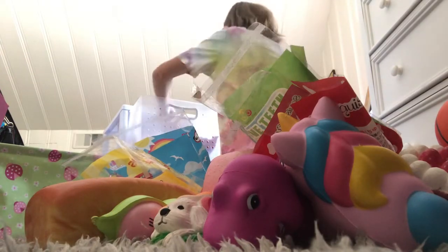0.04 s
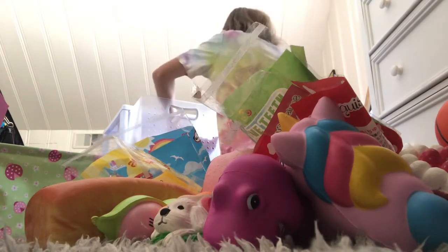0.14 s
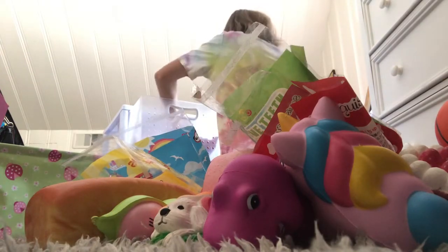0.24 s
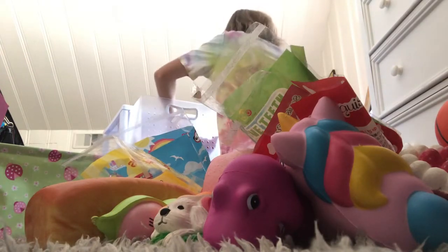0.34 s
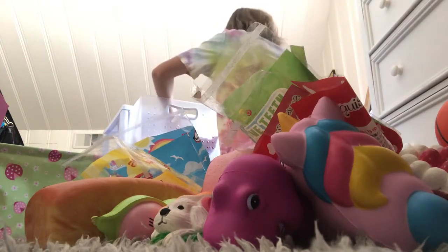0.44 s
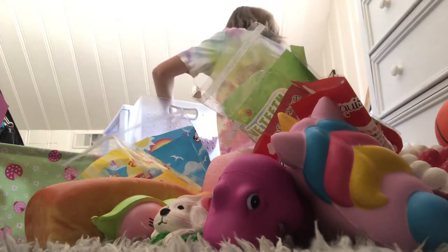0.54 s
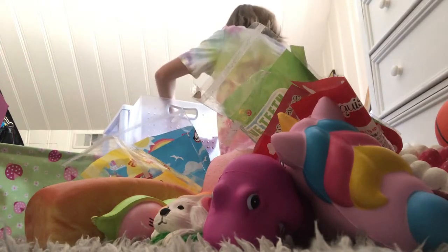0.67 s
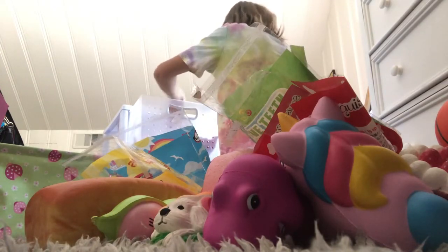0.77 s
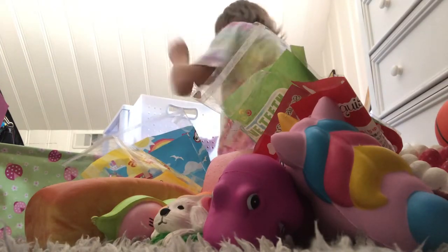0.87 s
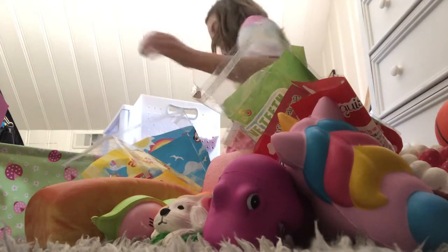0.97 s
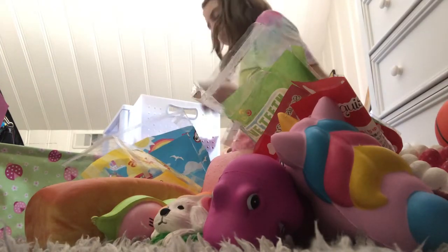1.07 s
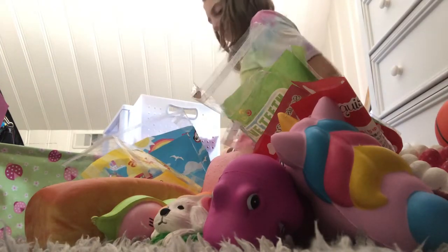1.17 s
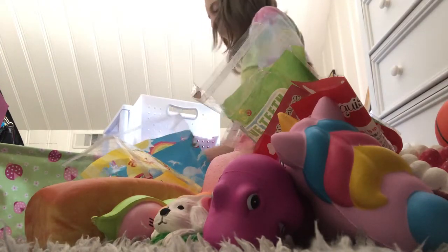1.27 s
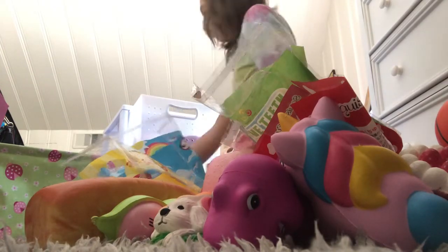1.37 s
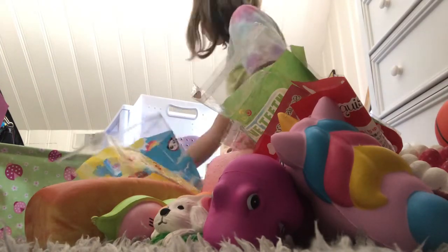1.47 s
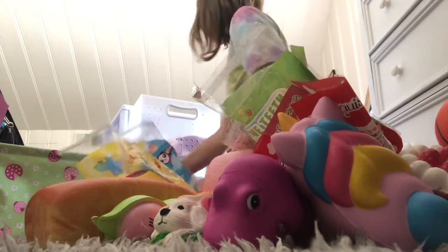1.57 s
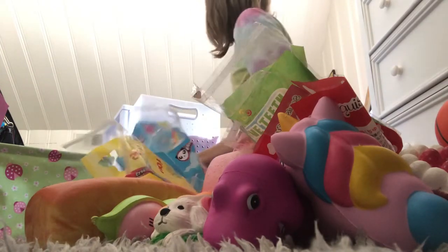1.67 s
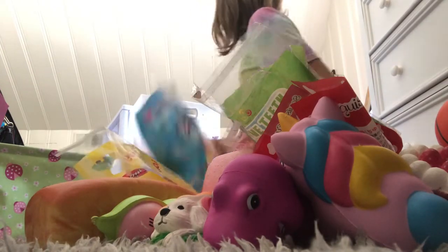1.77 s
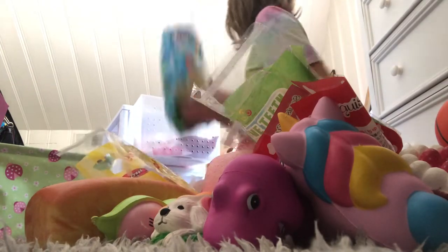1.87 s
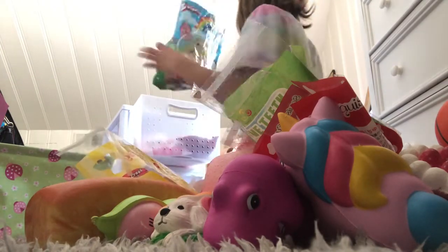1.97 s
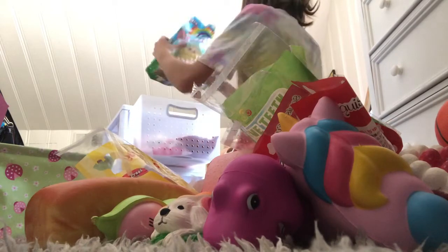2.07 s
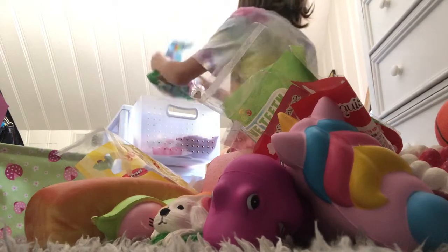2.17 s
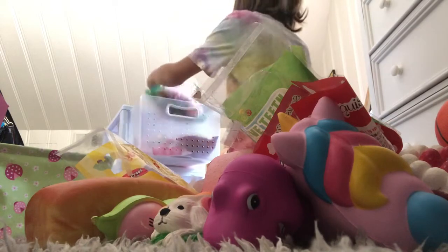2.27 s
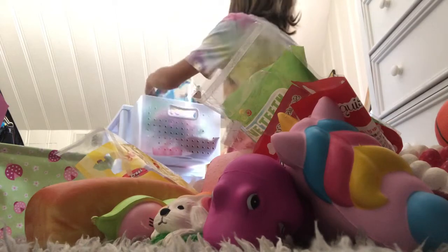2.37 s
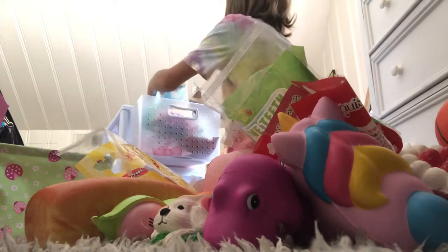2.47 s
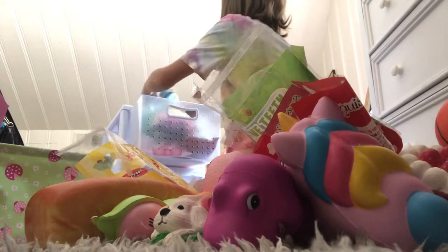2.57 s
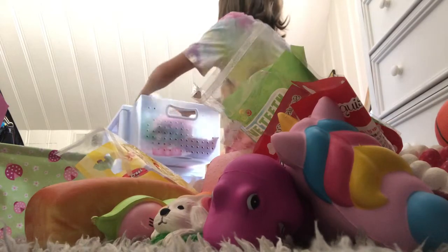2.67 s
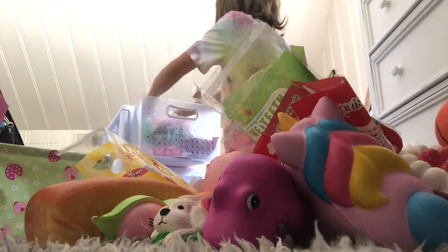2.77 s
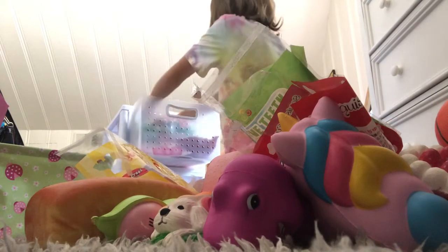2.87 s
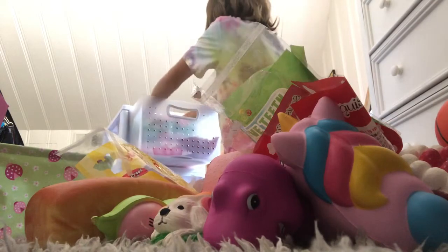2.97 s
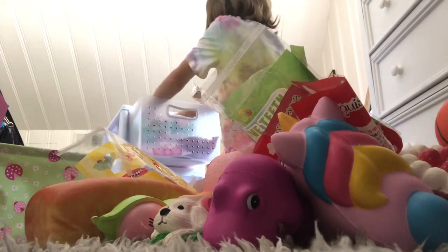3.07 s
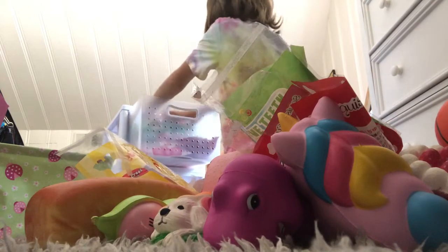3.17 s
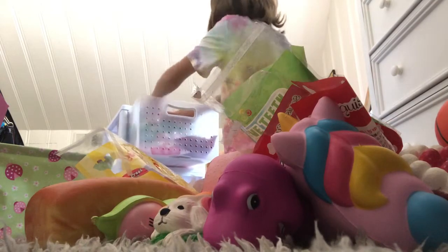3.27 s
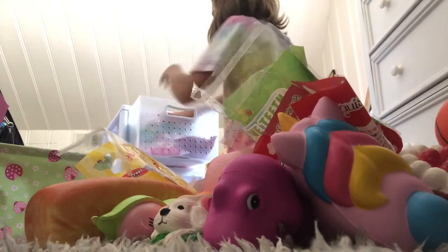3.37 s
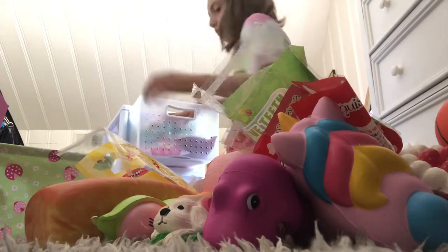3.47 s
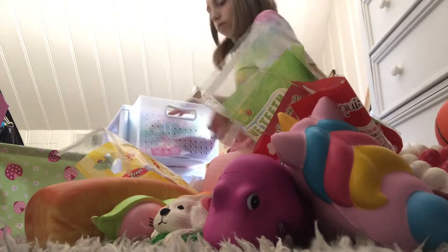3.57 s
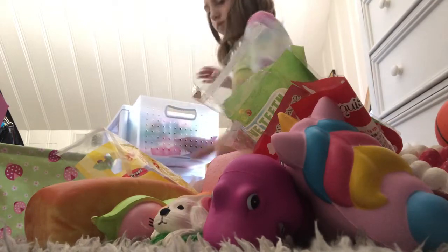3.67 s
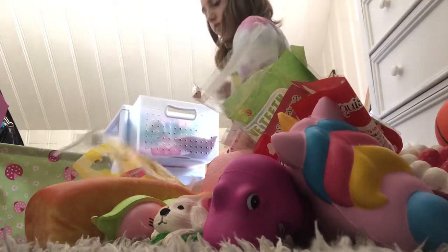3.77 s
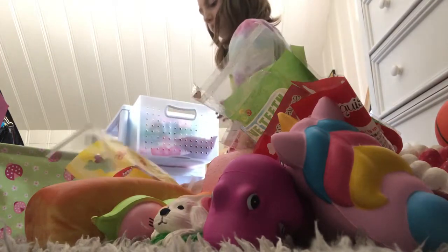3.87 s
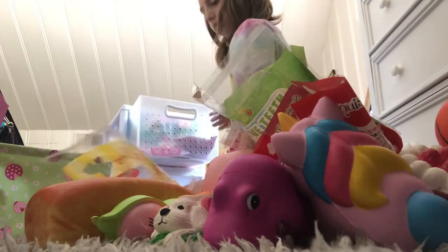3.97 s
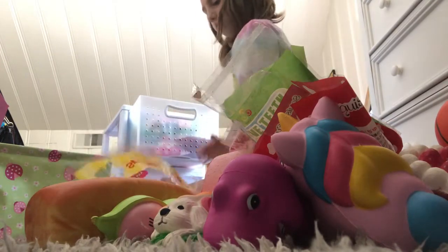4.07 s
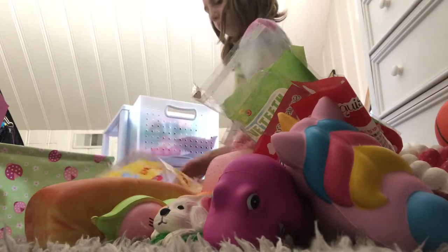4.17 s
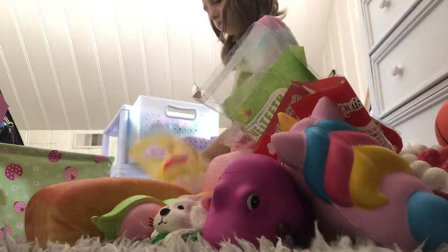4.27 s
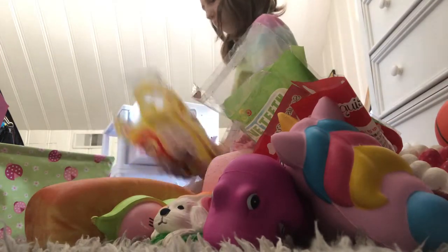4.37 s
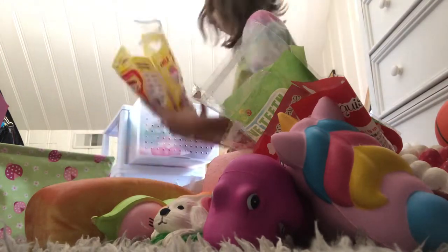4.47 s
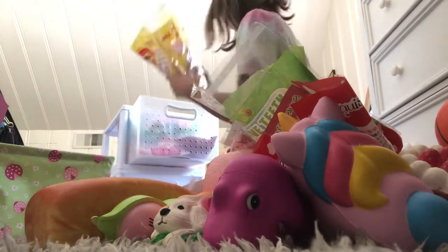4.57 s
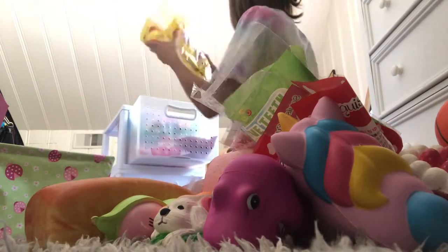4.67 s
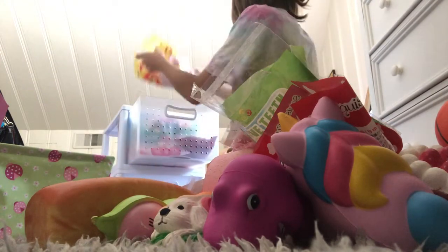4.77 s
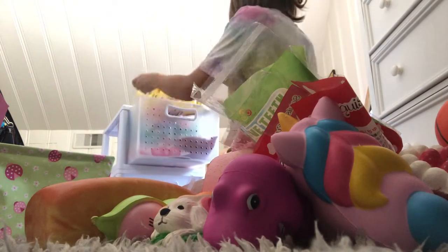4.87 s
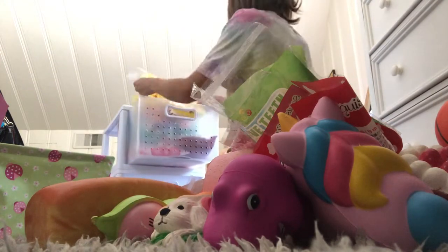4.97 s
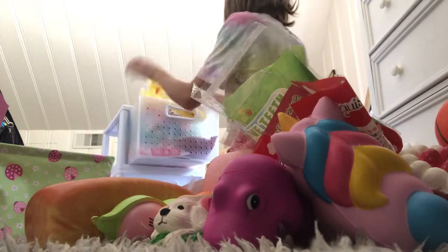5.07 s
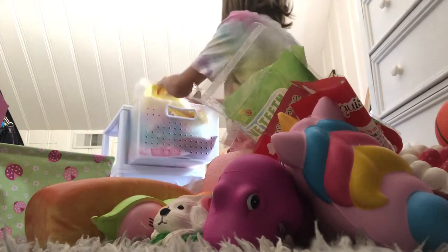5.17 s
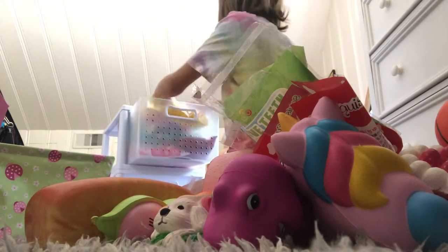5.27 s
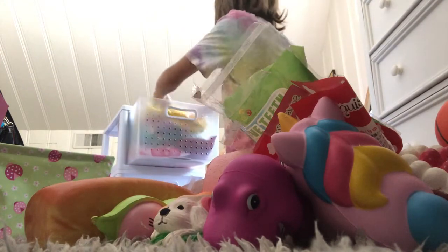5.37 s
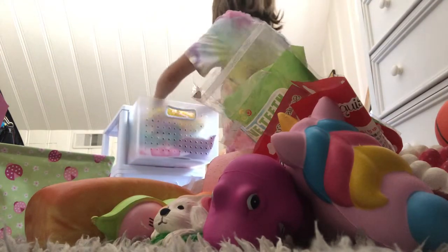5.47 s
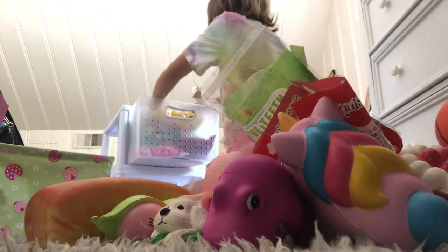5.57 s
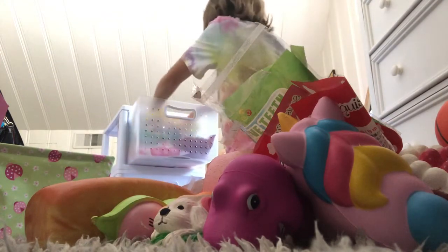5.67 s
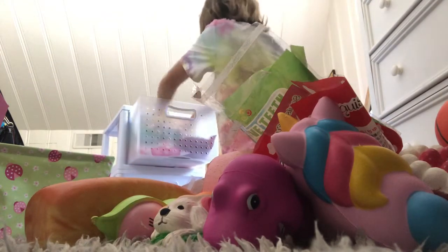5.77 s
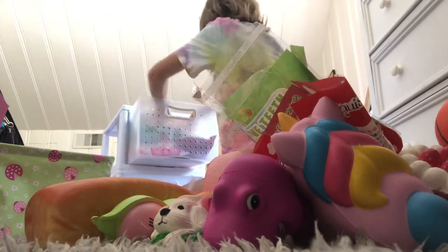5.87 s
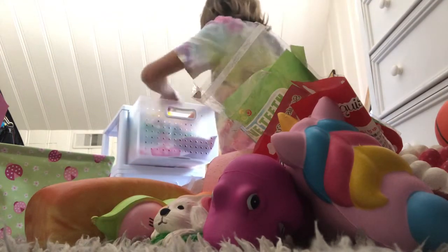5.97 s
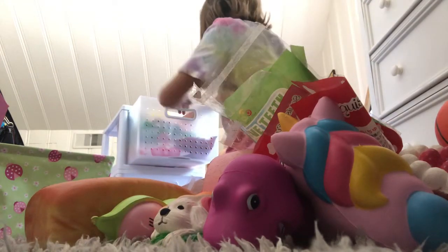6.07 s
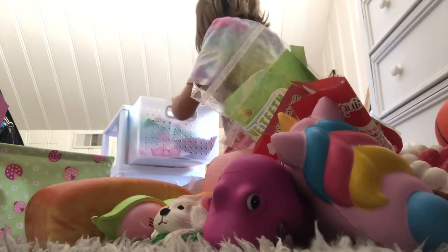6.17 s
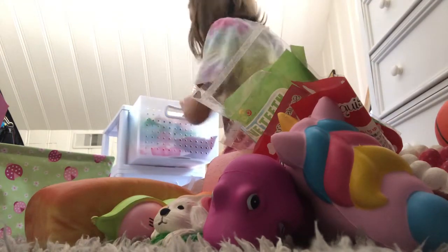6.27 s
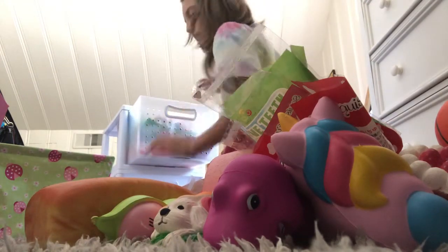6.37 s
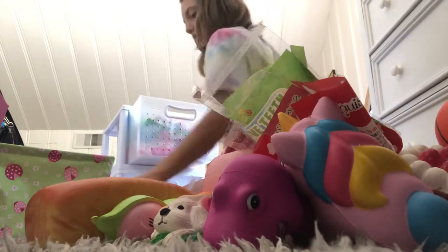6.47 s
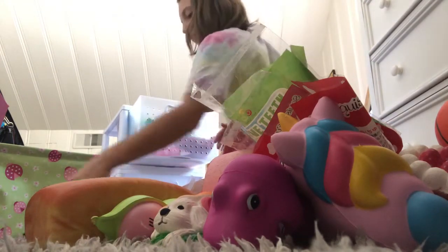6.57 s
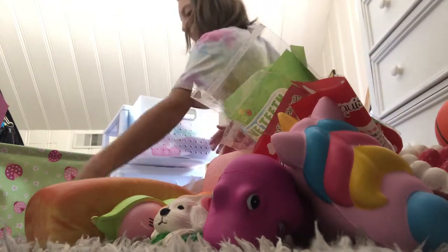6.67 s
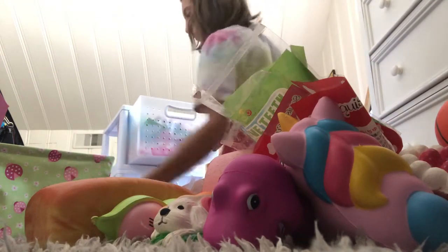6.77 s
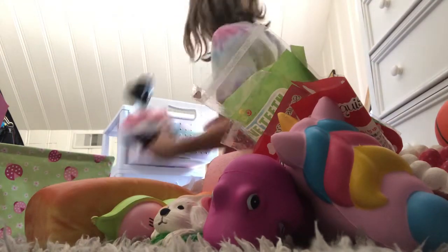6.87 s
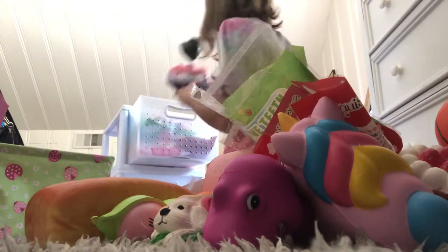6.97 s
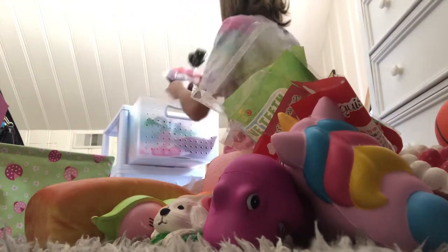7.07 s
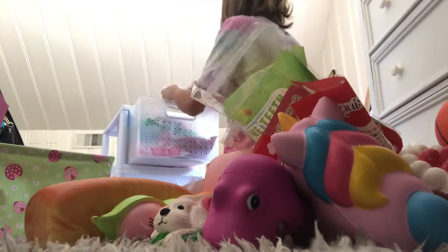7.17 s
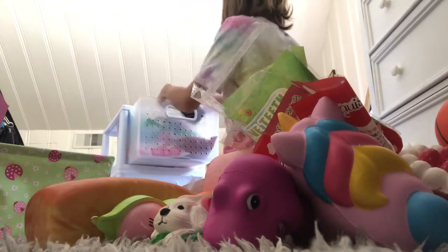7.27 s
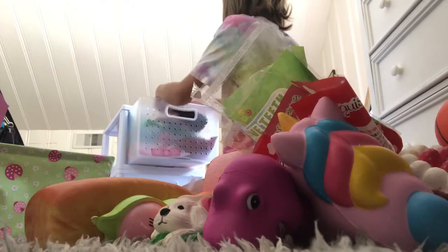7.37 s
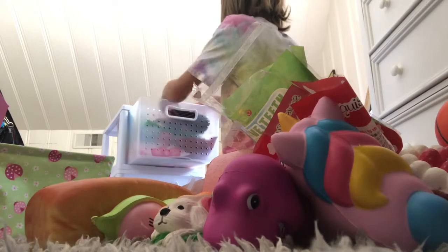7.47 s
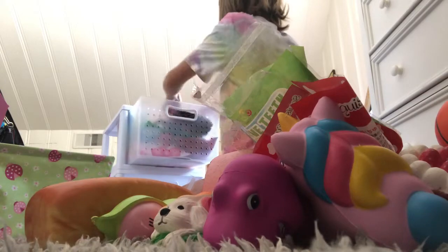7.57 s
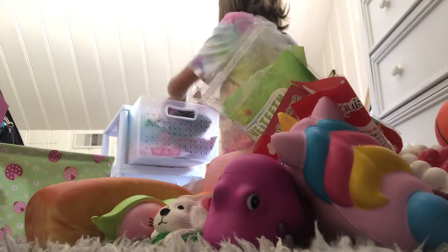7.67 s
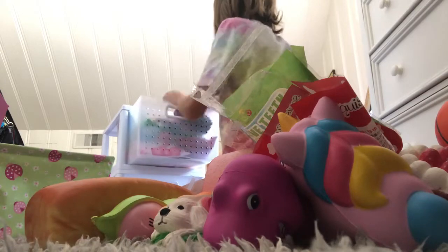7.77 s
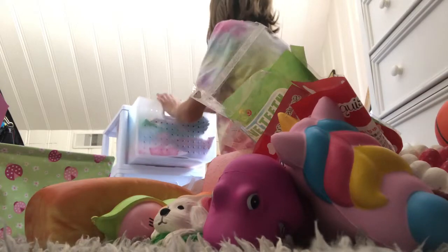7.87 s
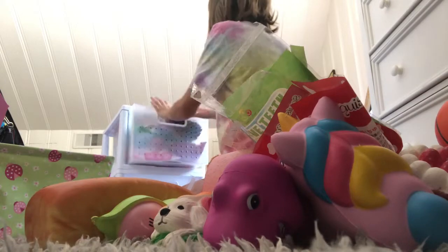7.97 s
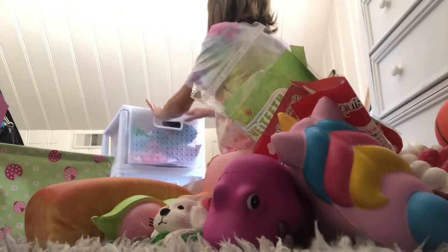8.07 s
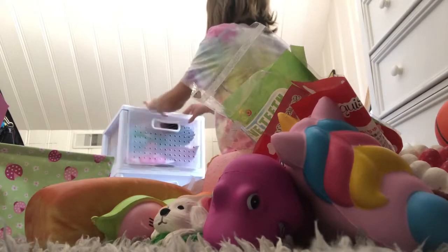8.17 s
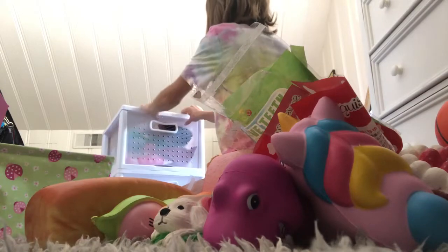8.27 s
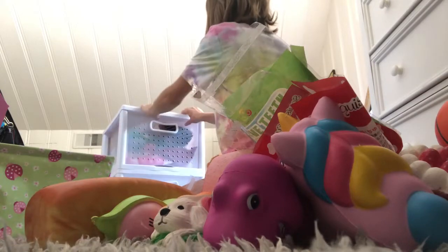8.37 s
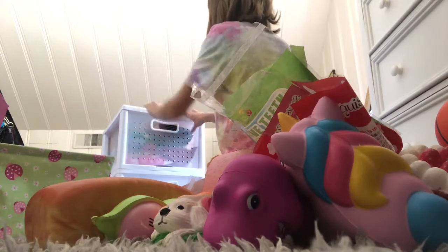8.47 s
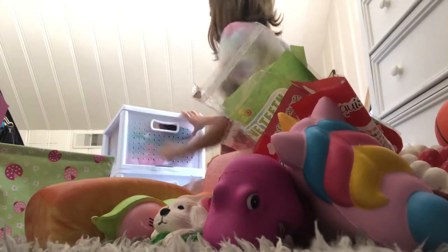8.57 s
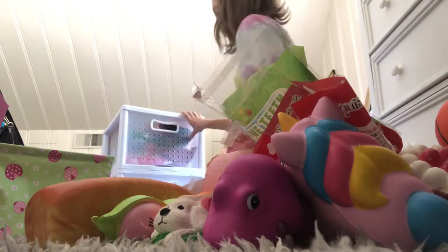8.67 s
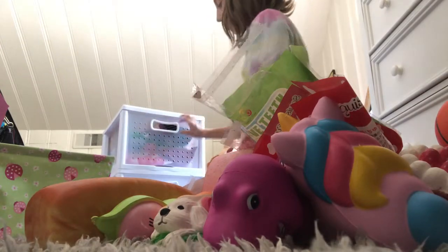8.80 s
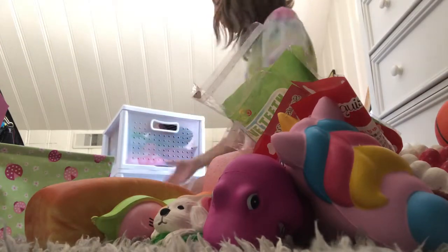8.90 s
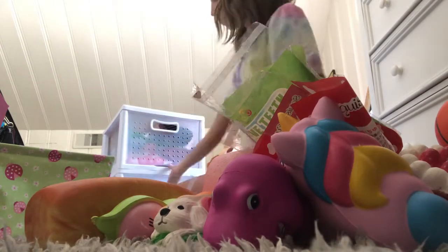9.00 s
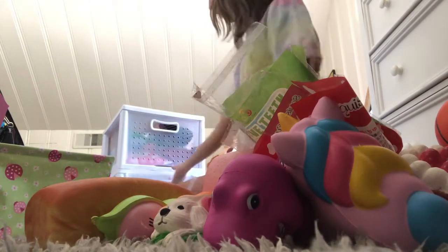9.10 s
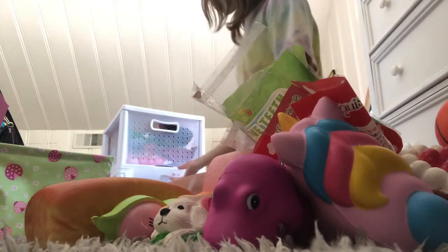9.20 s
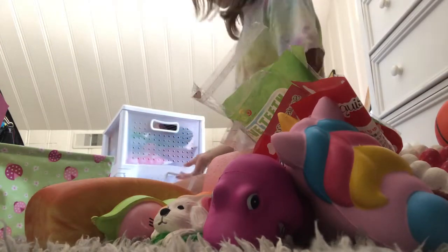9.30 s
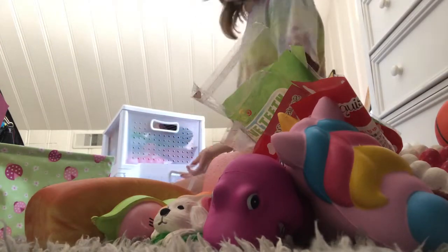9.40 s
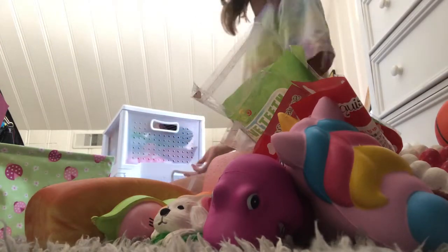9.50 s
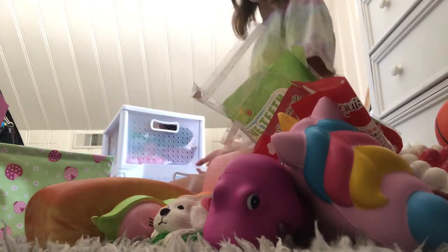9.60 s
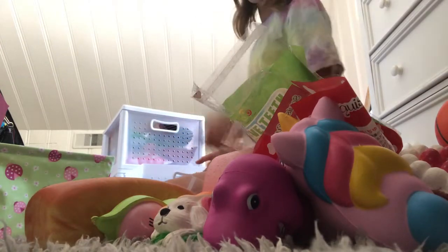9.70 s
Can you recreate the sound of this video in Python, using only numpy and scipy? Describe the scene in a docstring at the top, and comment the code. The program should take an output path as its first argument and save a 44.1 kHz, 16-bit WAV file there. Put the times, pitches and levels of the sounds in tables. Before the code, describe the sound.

Faint rustling gives way to loud crinkling as a packet is lifted and stuffed into a hollow plastic drawer, then a second, then a smaller one with a tiny squeak of film. Snaps are crisp, pops woody and short. A double knock closes the drawer; after near quiet, low scraping and several light knocks slide another out. Close microphone, dry small room, soft air noise.

```python
"""Plastic film crackles and snaps, panels pop and a hollow drawer rumbles in a small bedroom.
Toy packets are lifted, squeezed and stuffed into the drawer; it is then shut with a knock and the next slid out.
Film, panels and rubbing are random slips ringing banks of resonances, shaped by the strokes of the hands.
Snaps, pops and squeaks are single events; knocks ring the drawer's modes.
Cloth swishes once, over soft ventilation noise and a low hum."""
import sys
import numpy as np
from scipy import signal
from scipy.fft import rfft, irfft
from scipy.io import wavfile
from scipy.ndimage import uniform_filter1d

SR = 44100
rng = np.random.default_rng(int(sys.argv[2]) if len(sys.argv) > 2 else 0)


def store_pcm(level_fs):
    """Save levels as 16-bit WAV."""
    pcm = np.round(np.clip(level_fs, -1, 1) * 32767).astype(np.int16)
    wavfile.write(sys.argv[1], SR, np.atleast_2d(pcm).T)


N = 429534
TIME = np.arange(N) / SR
BRIEF = TIME[:13230]  # 0.3 s, for single events and echoes

# Ventilation spectrum. Each row: frequency in Hz, relative level in dB per Hz.
AIR_COLOUR = [(15, -87), (25, -78), (66, -18.5), (123, -11), (175, -6.5), (285, -10), (363, -13.5),
              (476, -3.5), (677, -5), (734, -3), (796, -7), (1190, -15.5), (3720, -31), (14800, -34.5),
              (16000, -48)]
# Drawer meeting its frame. Each row: start in seconds, relative level in dB,
# contact brightness (low-pass corner) in Hz, pitch of the modes as a ratio.
KNOCKS = [(4.941, -23, 1506, 1), (7.881, -22, 1400, 0.97), (8.103, -24, 1200, 0.93),
          (8.2942, -13.5, 1400, 0.92), (8.3044, -13.5, 1100, 1), (9.013, -24.5, 1500, 0.93),
          (9.169, -15.5, 1100, 0.95), (9.179, -16.5, 500, 0.59), (9.266, -22, 800, 0.86),
          (9.299, -25, 594, .68), (9.357, -21.5, 1090, 1), (9.405, -29, 700, 0.72), (9.475, -28, 400, 0.51),
          (9.52, -18.5, 910, 0.89), (9.543, -24, 1100, 0.83), (9.549, -18, 500, 0.84),
          (9.565, -24, 119.6, 0.99), (9.596, -27, 1000, 0.98)]
# Drawer resonances. Each row: frequency in Hz, relative level in dB, t60 in seconds.
DRAWER_MODES = [(76.5, -23, 0.44), (110, -26.5, 0.2), (136, -27, 0.4), (210, -11, 0.077), (272, -18, 0.14),
                (320, -15, 0.043), (423, -4.5, 0.047), (493, -0.5, 0.057), (582, 3.5, 0.061),
                (766, 10.5, 0.015), (956, -9, 0.077), (1110, 2, 0.046), (1196, -13, 0.11),
                (1390, 1.5, 0.03), (1540, -13, 0.073), (2080, -6, 0.0064), (2470, -8, 0.021),
                (2840, -6, 0.017), (3380, -7.5, 0.01), (5420, -11, 0.023), (7240, -20, 0.023)]
# Spectrum of hollow rubbing. Each row: frequency in Hz, relative level in dB per Hz.
HOLLOW_COLOUR = [(50, -47.5), (80, -21), (140, -11), (200, -5), (320, -1.5), (400, 2), (470, 7), (540, 5.5),
                 (620, 4.5), (800, 4.5), (1200, -3.5), (3000, -19)]
# Taut film squeaking under the fingers. Each row: start in seconds, length in seconds,
# slip rate at start in Hz, slip rate at end in Hz, overtone level in dB.
SQUEAKS = [(6.803, .024, 2600, 2680, -45), (6.822, .018, 2350, 2720, -38), (6.839, .02, 2150, 2600, -42)]
# Spectrum of flexing panels. Each row: frequency in Hz, relative level in dB per Hz.
PANEL_COLOUR = [(150, -32), (350, -22.5), (600, -6), (930, 1.5), (1350, 0), (1700, -6.5), (2200, -4),
                (3000, -22.5), (4200, -14), (9000, -14.5)]
# Stiff panels and toys popping against each other. Each row: start in seconds,
# relative level in dB, pitch in Hz, decay time constant of the push in ms.
POPS = [(0.539, -24, 479, 4.1), (0.804, -19.5, 720, 2), (1.294, -14.5, 513, 2.9), (1.3235, -7.5, 1100, 5.1),
        (1.597, -4, 1423, 11.4), (1.62, -6, 955, 4.3), (1.633, -10, 460, 3.1), (1.67, -9, 1110, 3.2),
        (1.683, -2, 930, 6.1), (1.717, -9, 960, 5.6), (1.752, -5.5, 1100, 7), (1.89, -1.5, 883, 3.5),
        (2.074, -0.5, 750, 2.2), (2.196, -11.5, 783, 3.5), (2.437, -14, 1440, 3.5), (2.578, -16, 2190, 7),
        (3.02, -15, 1001, 3.9), (3.247, -19, 743, 3.5), (3.279, -12.5, 991, 4.3), (3.798, -14, 921, 7.6),
        (3.83, -12, 821, 5.3), (3.844, -6.5, 890, 3.1), (4.013, -20, 930, 1.8), (4.089, -9, 684, 2.1),
        (4.277, -19.5, 960, 1.43), (4.389, -10.5, 890, 5), (4.675, -16.5, 770, 3.2),
        (4.94, -6.5, 1380, 3.7), (5.013, -19, 724, 4.9), (5.437, -7.5, 750, 6.7), (6.457, -20.5, 993, 5.8),
        (6.579, -20, 1960, 6.3), (6.712, -17, 921, 4.1), (6.786, -5, 1080, 6.5), (7.157, -16, 1010, 2.5),
        (7.331, -13.5, 940, 7.7), (7.37, -15, 1270, 4.2), (7.447, -16, 886, 4.1), (7.612, -13, 744, 4),
        (7.742, -18, 935, 2.8), (7.825, -10.5, 1270, 1.1), (7.88, -11, 840, 1.9), (7.964, -12, 1200, 5.4),
        (8.102, -11.5, 963, 3.4), (9.17, -12, 1140, 4.6)]
# Sharp creases snapping over. Each row: start in seconds, relative level in dB,
# pitch in Hz, relative share of the panel in dB.
SNAPS = [(0.0223, -31, 12300, -27), (0.186, -29, 7600, -13), (0.4638, -36, 7670, -4),
         (0.582, -35, 5520, -13), (0.626, -24.5, 13300, -13), (0.6868, -26, 13400, -23),
         (0.8036, -26.5, 7100, -8), (1.3104, -28, 4510, -6), (1.3503, -21, 8170, 1),
         (1.3608, -18, 10100, -3), (1.38, -17, 10200, -21), (1.4975, -15.5, 9790, -2),
         (1.6175, -12, 5330, -16), (1.748, -16, 11500, -20), (1.8146, -12.5, 9850, -5),
         (1.833, -11.5, 11400, -20), (1.8891, -13.5, 4910, -27), (1.9485, -16.5, 5700, -14),
         (1.9614, -17, 7390, -15), (1.9894, -4, 12400, -4.5), (1.994, -11, 6340, -25),
         (2.0662, -8.5, 14900, -0.5), (2.0724, -13, 5860, -12), (2.0877, -8.5, 9700, -4.5),
         (2.139, -5.5, 9410, -6.5), (2.2224, -15.5, 8000, -7), (2.2347, -20.5, 8160, 3),
         (2.311, -16, 5230, -19), (2.437, -20, 10700, -11), (2.5643, -12.5, 8360, -5),
         (2.5792, -18, 8020, -20), (2.597, -16, 9280, -22), (2.726, -25, 6000, 3),
         (2.8193, -10, 11500, -27), (2.9193, -26, 5000, 12.5), (3.2975, -18, 8140, -7),
         (3.344, -16.5, 8740, -12), (3.4282, -19.5, 8900, -8), (3.576, -26, 7640, -1),
         (3.706, -35, 8540, -18), (4.064, -18.5, 11600, -24), (4.347, -33, 4950, 3),
         (4.3694, -23, 14000, -15), (4.4005, -30.5, 4200, 6), (4.506, -24, 8220, -16),
         (4.5466, -14, 10600, -16), (4.577, -15, 13800, -15), (4.6064, -8, 10100, -10.5),
         (4.6564, -18.5, 6830, -2), (4.799, -20, 11800, -4), (4.8369, -9.5, 13200, -6.5),
         (5.183, -16.5, 7850, -12), (5.447, -14.5, 9300, -17), (5.6386, -16, 9310, -0.5),
         (6.3939, -31, 8630, -6), (6.505, -15, 10400, -13), (6.537, -13, 12000, -30),
         (6.553, -20, 10900, -27), (6.6782, -32.5, 7190, 8), (6.7306, -23, 13700, 0),
         (6.761, -21, 11900, -4), (6.7922, -15, 13900, -13), (6.948, -18, 14400, -25),
         (7.0275, -26, 8850, -25), (7.0334, -22, 8270, -16), (7.2466, -18, 13300, -6.5),
         (7.2727, -22, 10200, -18), (7.412, -20, 7810, -3), (7.8236, -20, 10000, -18),
         (8.4048, -35.5, 8700, -7), (8.4866, -40, 5130, -4), (9.009, -38, 9000, -4)]
# Spectrum of creasing film. Each row: frequency in Hz, relative level in dB per Hz.
CREASE_COLOUR = [(400, -15.5), (1200, -7), (2200, -4), (3000, -3.5), (3900, -7), (5200, -2), (7000, 2.5),
                 (9000, 4), (12000, 2), (15500, 0)]
# Where the packet is. Each row: time in seconds, share inside the drawer from 0 to 1,
# tautness of the film as top treble gain in dB.
PLACE = [(0, 0.5, 5.5), (.8, 0.55, -1.5), (1.3, 0.5, 2.5), (2.1, 0.9, -2.5), (2.45, 0.97, -1.5),
         (3.5, 1, -5), (3.8, 0.57, 2.5), (4.7, 0.6, -3.5), (5.2, 1, 1.5), (6.35, 1, -2), (6.5, 0.2, -1),
         (6.82, 0.1, 10.5), (7.0, 0, 5.5), (7.4, 0.7, 2.5), (8.2, 1, -6), (8.8, 1, 20), (9.6, 1, -19)]
# Each grip, pull or push of the hands. Each row: start in seconds, length in seconds,
# crease crackle in dB, panel flexing in dB, hollow rubbing in dB, swell from start to end in dB.
STROKES = [ (0.01, 0.068, -37, -48, -47, 6), (0.098, .07, -47, -47.5, -56, 4),
           (0.16, 0.27, -38.5, -44, -49.5, -8), (0.458, 0.13, -48, -52, -51, -3),
           (0.613, 0.21, -49, -54, -54.5, -14), (1.293, 0.055, -49, -37, -43, 6),
           (1.346, 0.074, -38, -35.5, -47, -4), (1.452, .11, -33, -32, -37.5, 2.5),
           (1.567, 0.069, -26.5, -26.5, -33, 2.5), (1.658, 0.2, -31, -30, -37, -7.5),
           (1.901, 0.11, -31.5, -35, -42, 8), (2.036, 0.052, -25, -29.5, -35.5, -2),
           (2.095, .24, -31, -39.5, -39, -2.5), (2.356, 0.086, -32, -32.5, -40, 12),
           (2.452, 0.36, -32, -40, -40, 0.5), (2.774, 0.083, -28, -31, -36.5, 3.5),
           (2.854, .17, -33.5, -36.5, -42, 3.5), (3.029, .17, -38.5, -41, -45, 6),
           (3.234, 0.16, -34.5, -38, -42, -2.5), (3.425, 0.092, -37, -42, -39.5, -8),
           (3.506, 0.093, -46, -45.5, -46, -5), (3.62, 0.12, -55, -56, -52, -6),
           (3.794, 0.033, -38, -37, -39, -2), (3.823, 0.078, -35, -33, -40, -5.5),
           (3.922, 0.096, -39, -33, -43, 6), (4.041, .15, -36, -34, -41, -3),
           (4.237, 0.065, -43.5, -41.5, -50, 12.5), (4.338, 0.14, -45.5, -45, -46.5, -5),
           (4.515, 0.19, -35, -40, -45.5, -5), (4.69, 0.18, -39, -49, -47, 8),
           (4.878, .28, -34.5, -40.5, -43, -3.5), (5.17, 0.063, -32, -37.5, -39.5, -1),
           (5.216, 0.25, -28.5, -34.5, -36.5, 0), (5.464, .13, -37.5, -40.5, -44, 2),
           (5.603, 0.072, -32.5, -36, -44, -1), (5.683, .25, -30.5, -36.5, -40, -2.5),
           (5.94, 0.13, -33.5, -40, -46, -1), (6.096, 0.13, -32.5, -37, -40, -3),
           (6.263, 0.066, -36.5, -38.5, -48, -2), (6.342, 0.066, -44, -54, -62, 4),
           (6.492, .06, -30, -38, -48, -5), (6.582, .09, -54, -49, -59, -14),
           (6.694, 0.15, -36.5, -36.5, -46.5, 9.5), (6.884, 0.088, -46, -44, -49.5, -3),
           (7.008, 0.1, -43.5, -49.5, -50, -1), (7.141, 0.095, -44, -50, -54, -1),
           (7.223, 0.37, -36.5, -43, -47.5, 7), (7.56, 0.087, -31, -35, -43, -4.5),
           (7.645, 0.15, -37, -39, -47, -6), (7.844, 0.045, -42.5, -44, -45.5, 2),
           (7.877, 0.2, -36, -42.5, -48.5, -6), (8.074, 0.038, -33, -40, -43, 3),
           (8.135, .17, -46, -45, -52, 11), (9.016, 0.12, -63, -53, -46.5, -7),
           (9.121, 0.23, -45, -42, -44, -4.5), (9.385, 0.078, -46, -43.5, -42.5, 2),
           (9.474, 0.069, -50, -37.5, -47, 8)]
CREASE, PANEL, HOLLOW = 2, 3, 4  # columns of STROKES

AIR_DB, HUM_HZ, HUM_DB = -45.5, 134, -59.5
SLEEVE_START_S, SLEEVE_LENGTH_S, SLEEVE_DB = 8.72, 0.38, -46.5
STROKE_ATTACK_S, STROKE_ATTACK_SHARE = 0.009, 0.073  # a long stroke takes hold more gently
STROKE_RELEASE_S = 0.02  # the film goes on settling after the hand stops
GRIP_WAVER_DB, GRIP_WAVER_PER_S = 1.1, 28  # uneven finger pressure
POP_LOW_HZ, POP_HIGH_HZ, POP_TICK_SHARE = 360, 2120, 0.047
SNAP_SHIVER_S, SNAP_FOLLOW_S, SNAP_FOLLOW_DB = 0.0016, 0.009, -11
LESSER_PER_S, LESSER_DB, LESSER_SPREAD_DB = 26, 7.5, 2.5
LESSER_HZ, LESSER_PANEL_DB = 9850, -7
FOLDS_PER_S, FOLD_SPREAD_DB = 66, 4
TOP_HZ = 15800


def undb(db):
    """Decibels to gain."""
    return 10 ** (np.asarray(db) / 20)


def unit(x):
    """Scale to an rms of one."""
    return x / np.sqrt(np.mean(x ** 2))


def band(x, low_hz, high_hz):
    """Band-pass."""
    return signal.sosfilt(signal.butter(3, [low_hz, high_hz], "band", fs=SR, output="sos"), x)


def in_band(x, low_hz, high_hz):
    """Scale to an rms of one within a band."""
    return x / np.std(band(x, low_hz, high_hz))


def ring(x, hz, q):
    """One resonance, gain 1 at its centre."""
    w = 2 * np.pi * min(hz, 0.45 * SR) / SR
    a = np.sin(w) / (2 * q)
    return signal.lfilter([a, 0, -a], [1 + a, -2 * np.cos(w), 1 - a], x + 1e-18)


def colour(x, points, size=4096):
    """Minimum-phase filter with the given (Hz, dB) response."""
    hz, db = np.transpose(points)
    grid_hz = np.linspace(1, SR / 2, size // 2 + 1)
    gain = undb(np.interp(np.log(grid_hz), np.log(hz), db))
    # folding the cepstrum makes the response causal
    cepstrum = irfft(np.log(gain))
    cepstrum[1:size // 2] *= 2
    cepstrum[size // 2 + 1:] = 0
    impulse = irfft(np.exp(rfft(cepstrum)))
    return signal.fftconvolve(x, impulse)[:len(x)]


def walk(rate_per_s):
    """Random wander: straight lines between normal draws."""
    return np.interp(TIME * rate_per_s, np.arange(4096), rng.standard_normal(4096))


def add(track, start_s, sound):
    """Mix a sound into the track."""
    start = max(int(start_s * SR), 0)
    track[start:start + len(sound)] += sound[:N - start]


def crackle(low_hz, high_hz, rate_per_s, spread_db, scatter_db, q, bunch_db, count):
    """Tiny random slips in bunches; each rings a different mix of facet resonances."""
    at = np.flatnonzero(rng.random(N) < rate_per_s / SR)
    size_db = spread_db * np.minimum(rng.exponential(size=N), 5) + bunch_db * walk(70)
    sizes = undb(size_db)[at]
    out = 0
    for hz in np.geomspace(low_hz, high_hz, count):
        strength, direction = rng.standard_normal((2, len(at)))
        push = np.zeros(N)
        push[at] = sizes * np.sign(direction) * undb(scatter_db * strength)
        out = out + ring(push, hz, q) / np.sqrt(min(hz, SR / 5) / SR)
    # the hand feeds in energy evenly, however the slips share it
    return out / np.sqrt(uniform_filter1d(out ** 2, size=2200) + 1e-9)


def effort(column):
    """Gain of one handling layer: strokes take hold, swell or ease, then die away; powers add."""
    power = np.zeros(N)
    for stroke in STROKES:
        start_s, length_s, swell_db = stroke[0], stroke[1], stroke[-1]
        age = TIME - start_s
        near = (age > 0) & (age < length_s + 0.2)
        age = age[near]
        hold = undb(stroke[column] + swell_db * (np.minimum(age / length_s, 1) - 0.5))
        attack = np.minimum(age / (STROKE_ATTACK_S + STROKE_ATTACK_SHARE * length_s), 1)
        release = np.exp(-np.maximum(age - length_s, 0) / STROKE_RELEASE_S)
        power[near] += (hold * attack * release) ** 2
    return np.sqrt(power) * undb(GRIP_WAVER_DB * walk(GRIP_WAVER_PER_S))


def air():
    """Ventilation: coloured noise, plus noise through a doubled resonance as a wavering hum."""
    rush = unit(colour(rng.standard_normal(N), AIR_COLOUR)) * undb(AIR_DB + 0.3 * walk(18))
    hum = unit(ring(ring(rng.standard_normal(N), HUM_HZ, 8.1), HUM_HZ, 8.1))
    return rush + undb(HUM_DB) * hum


def bedroom(x, wet_db, low_t60_s, high_t60_s, count=4):
    """Close walls answer with decaying echoes whose patterns fade into each other as the hands move."""
    out, place = x, np.pi * (TIME + 0.35 * walk(2))
    for k in range(count):
        noise = rng.standard_normal(len(BRIEF))
        low = band(noise, 74, 1990) * undb(-60 * BRIEF / low_t60_s)
        high = band(noise, 2000, 17000) * undb(-60 * BRIEF / high_t60_s - 3)
        echoes = (low + high) * (BRIEF > 0.003)
        echoes = echoes / np.linalg.norm(echoes)
        share = np.cos(place * (1 + k / count) + k) * np.sqrt(2 / count)
        out = out + undb(wet_db) * signal.fftconvolve(x * share, echoes)[:N]
    return out


def sleeve():
    """Cloth brushes along as the arm reaches down: band-passed noise with a smooth swell."""
    swell = np.sin(np.pi * np.clip((TIME - SLEEVE_START_S) / SLEEVE_LENGTH_S, 0, 1))
    cloth = rng.standard_normal(N)
    swish = unit(band(cloth, 720, 2330)) + undb(-11) * cloth
    return undb(SLEEVE_DB + 1.7 * walk(25)) * swell * swish


def knocks():
    """Each blow rings the drawer's modes and rattles its walls; a softer contact is duller."""
    out = np.zeros(N)
    for start_s, db, bright_hz, pitch in KNOCKS:
        modes = np.zeros(len(BRIEF))
        for hz, mode_db, t60_s in DRAWER_MODES:
            a, b = rng.standard_normal(2)
            decay = undb(mode_db + 3.3 * a - 60 * BRIEF / t60_s)
            modes += decay * np.sign(b) * np.sin(2 * np.pi * hz * pitch * (1 + 0.0091 * b) * BRIEF)
        rattle = rng.standard_normal(len(BRIEF)) * np.exp(-BRIEF / 0.009)
        blow = modes + 2 * band(rattle, 260, 3100) + 1.43 * rattle
        blow = signal.lfilter(*signal.butter(1, bright_hz, fs=SR), blow)
        blow = band(blow, 82, 15000)  # thin walls radiate little deep bass
        add(out, start_s, undb(db + 19) * blow / np.linalg.norm(blow))
    return out


def hollow():
    """Packets and hands rub the hollow drawer: low slips make it rumble."""
    rub = crackle(82, 1454, rate_per_s=420, spread_db=2.5, scatter_db=5, q=4.65, bunch_db=2, count=9)
    return effort(HOLLOW) * in_band(colour(rub, HOLLOW_COLOUR), 180, 550)


def squeaks():
    """A finger sticks and slips on film, faster as it pulls; the thin sheet radiates only overtones."""
    out = np.zeros(N)
    for start_s, length_s, start_hz, end_hz, db in SQUEAKS:
        progress = np.clip(BRIEF / length_s, 0, 1)
        jitter = uniform_filter1d(rng.standard_normal(len(BRIEF)), size=40)
        slip_hz = (start_hz + (end_hz - start_hz) * progress) * (1 + 0.053 * jitter)
        phase = 2 * np.pi * np.cumsum(slip_hz) / SR
        overtones = sum(np.sin(k * phase) for k in range(2, 7))
        add(out, start_s, undb(db) * np.sin(np.pi * progress) * overtones)
    return out


def panels():
    """The wide faces of a packet flex with duller, longer-ringing crackles."""
    flex = crackle(409, 4630, rate_per_s=380, spread_db=4, scatter_db=4, q=7.5, bunch_db=1.5, count=12)
    return effort(PANEL) * in_band(colour(flex, PANEL_COLOUR), 700, 2000)


def pops():
    """A stiff panel buckles and rings for a few cycles, with a small tick at its edge."""
    out = np.zeros(N)
    for start_s, db, hz, decay_ms in POPS:
        decay = np.exp(-1000 * BRIEF / decay_ms) + 0.06 * np.exp(-BRIEF / 0.016)
        push = rng.standard_normal(len(BRIEF)) * decay
        body = band(ring(push, hz, 5) + 0.35 * push, POP_LOW_HZ, POP_HIGH_HZ)
        pop = body + POP_TICK_SHARE * push
        add(out, start_s, undb(db + 9.5) * pop / np.linalg.norm(pop))
    return out


def lesser_snaps():
    """Rows like SNAPS: lesser creases give way at random, as strong as the film is being worked."""
    worked = effort(CREASE)
    at = np.flatnonzero((rng.random(N) < LESSER_PER_S / SR) & (worked > 0))
    rows = []
    for i in at:
        a, b, c = rng.standard_normal(3).clip(-2, 2)
        db = 20 * np.log10(worked[i]) + LESSER_DB + LESSER_SPREAD_DB * a
        rows.append((i / SR, db, LESSER_HZ * 1.6 ** b, LESSER_PANEL_DB + 5 * c))
    return rows


def snaps():
    """A crease strains for a millisecond, flips with a crack, shivers, and pushes the panel around it."""
    out = np.zeros(N)
    flip = np.exp(-np.abs(BRIEF - 0.0012) / 0.00018)
    shiver = 0.4 * np.exp(-BRIEF / SNAP_SHIVER_S) + 0.03 * np.exp(-BRIEF / 0.008)
    for start_s, db, hz, panel_db in list(SNAPS) + lesser_snaps():
        edge, panel = rng.standard_normal((2, len(BRIEF)))
        # neighbouring facets follow, more weakly, within a few milliseconds
        lags_s = SNAP_FOLLOW_S * rng.uniform(0.2, 1, size=3)
        follow = sum(np.roll(flip, int(lag_s * SR)) for lag_s in lags_s)
        edge = edge * (flip + shiver + undb(SNAP_FOLLOW_DB) * follow)
        crack = band(edge, 0.48 * hz, 17000) + 1.5 * ring(edge, hz, 1.8)
        push = band(panel * np.exp(-BRIEF / 0.0051), 450, 3400)
        snap = undb(14) * crack / np.linalg.norm(crack)
        snap = snap + undb(panel_db + 15) * push / np.linalg.norm(push)
        add(out, start_s, undb(db) * snap)
    return out


def film():
    """Film crackles in grains and fold slips; inside the drawer smooth sliding grows and the walls ring."""
    s, inside, taut_db = np.transpose(PLACE)
    inside, taut_db = np.interp(TIME, s, inside), np.interp(TIME, s, taut_db)
    grains = crackle(1544, 13460, rate_per_s=1100, spread_db=0, scatter_db=4.5, q=3.8, bunch_db=3.5, count=10)
    sliding = undb(-6 + 5 * inside + 2.5 * walk(60)) * rng.standard_normal(N)
    # longer folds give way in millisecond-long runs of slips
    fold_sizes = undb(FOLD_SPREAD_DB * rng.standard_normal(N).clip(-2, 1.5))
    folds = (rng.random(N) < FOLDS_PER_S / SR) * fold_sizes
    runs = signal.lfilter([1], [1, -np.exp(-1 / (0.0009 * SR))], folds) * rng.standard_normal(N)
    creases = colour(grains + sliding + 4.2 * (1 - 0.5 * inside) * runs, CREASE_COLOUR)
    # tautness sets the top treble
    top = signal.sosfiltfilt(signal.butter(2, 10500, "high", fs=SR, output="sos"), creases)
    creases = in_band(creases + (undb(taut_db) - 1) * top, 4000, 16000)
    walls = np.zeros(N)
    for hz, db, t60_s in DRAWER_MODES:
        q = np.pi * hz * t60_s / np.log(1000)
        walls += undb(db) * ring(creases, hz, q)
    return effort(CREASE) * (creases + undb(8) * inside * walls)


def scene():
    """All handling sounds in the bedroom's echoes, over the air."""
    handling = sleeve() + knocks() + hollow() + squeaks() + panels() + pops() + snaps() + film()
    return (bedroom(handling, wet_db=-12, low_t60_s=0.14, high_t60_s=0.15) + air())[None]


def record(dry):
    """The microphone chain drops the deep bass, clips the highest peaks and cuts the top."""
    x = signal.sosfilt(signal.butter(8, 60, "high", fs=SR, output="sos"), dry)
    x = np.clip(x, -1, 1)
    return signal.sosfilt(signal.ellip(10, 0.2, 70, TOP_HZ, fs=SR, output="sos"), x)


dry = scene()
out = record(dry)
store_pcm(out)
```